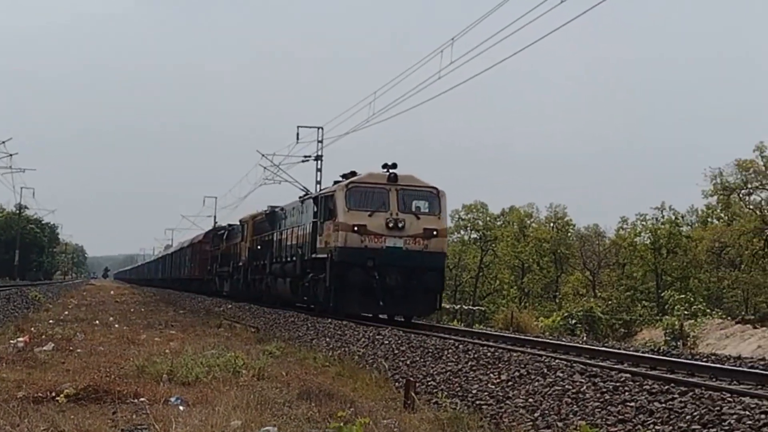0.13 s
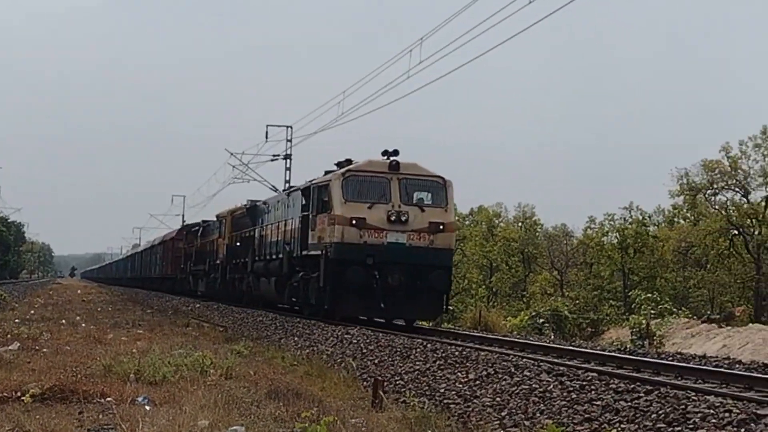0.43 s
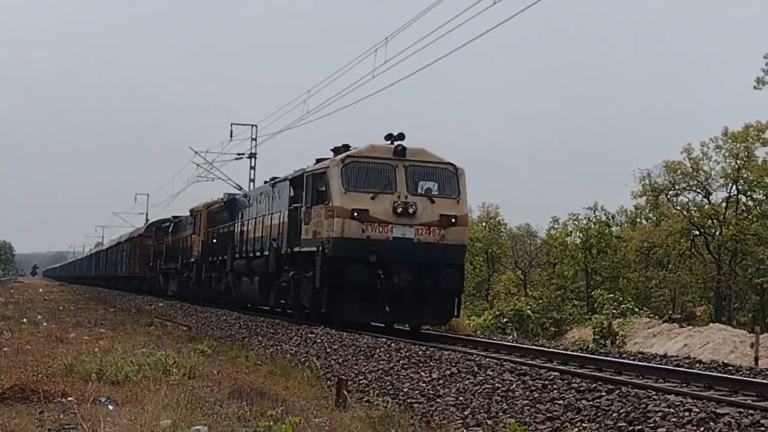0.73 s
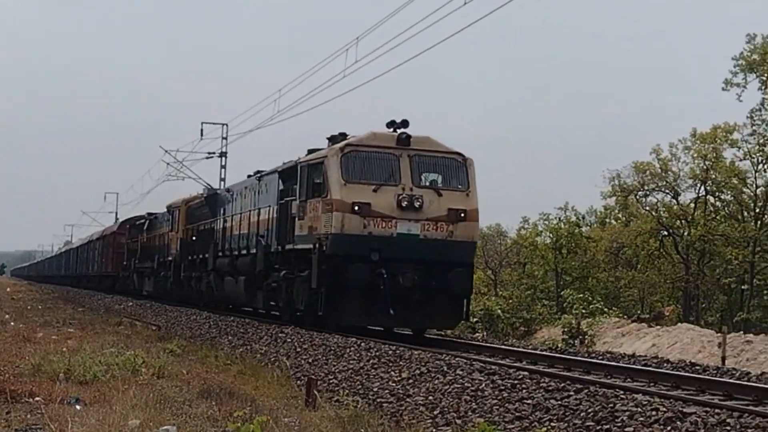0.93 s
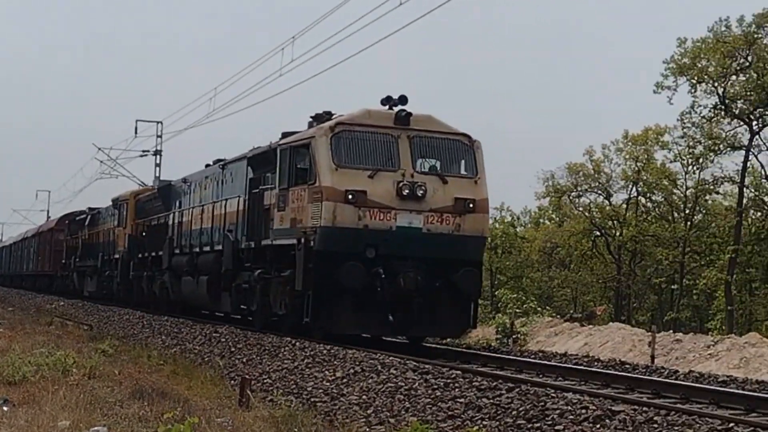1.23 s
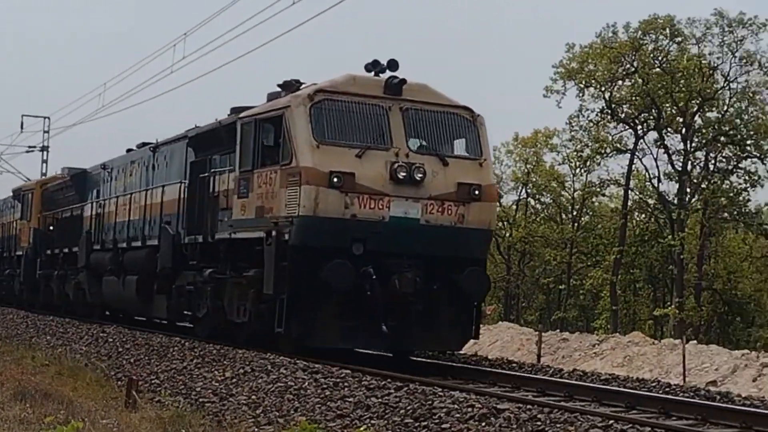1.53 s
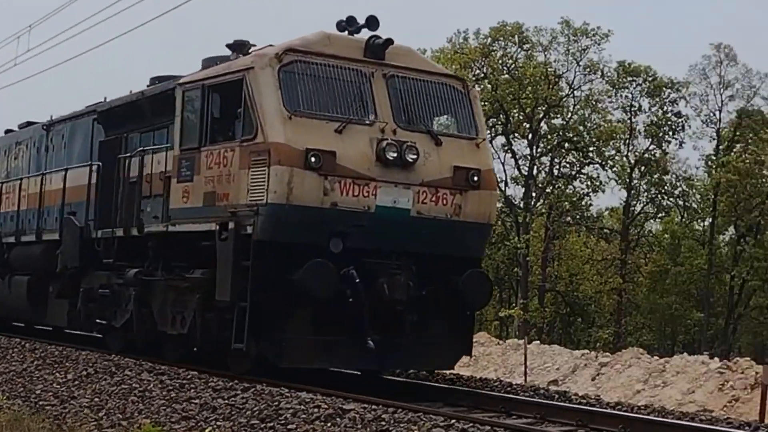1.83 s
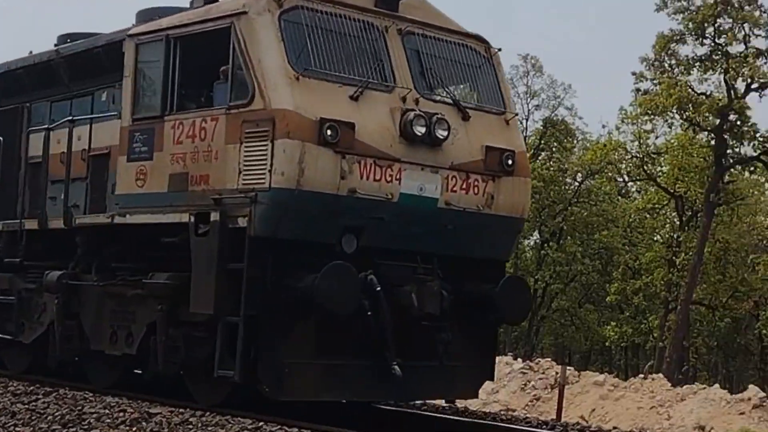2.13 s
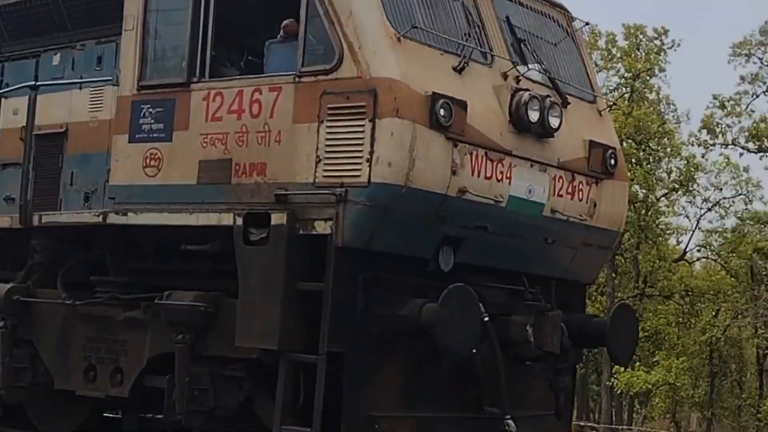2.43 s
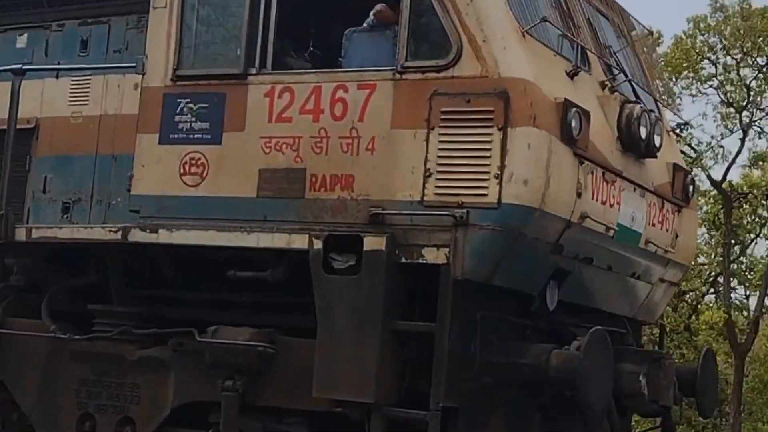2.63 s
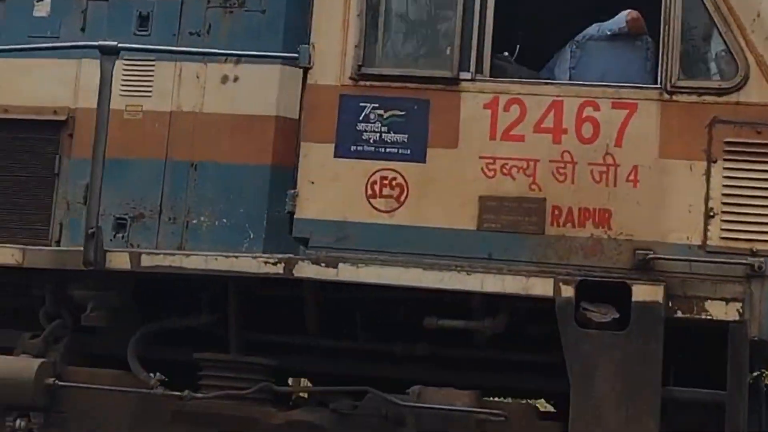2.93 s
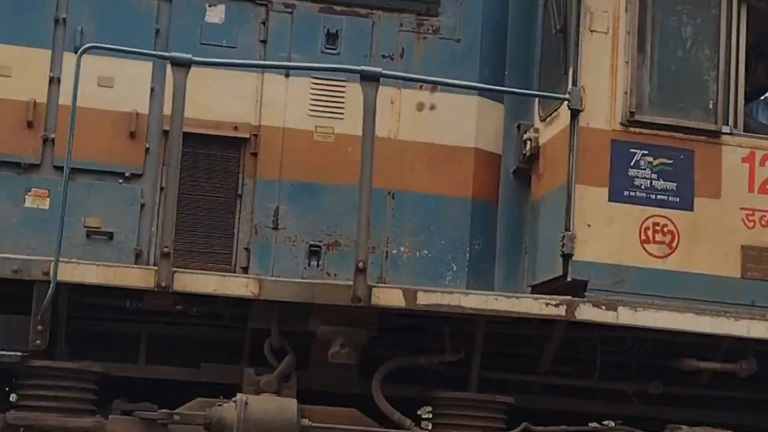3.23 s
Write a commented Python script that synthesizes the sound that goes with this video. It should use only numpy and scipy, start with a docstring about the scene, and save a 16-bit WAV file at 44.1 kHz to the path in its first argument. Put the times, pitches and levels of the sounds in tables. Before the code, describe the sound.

Two diesel engines throb low and unevenly in open air, with wind rumbling on a mono trackside microphone, strongest around 1 s, and a soft bump at 0.5 s. From 1.4 s fan drone and rolling roar build; pulsing gear whine jumps forward near 2.3 s. Around 2.8-3.4 s the cab passes close, with loud roar, machinery hum, bright rail hiss, fluttering whistles and tiny steel scrapes.

```python
"""Two diesel locomotives haul a goods train up to a trackside microphone; the first cab passes at the end.
Their exhausts throb and beat as combs of low sines over rumbling noise; fans drone in a rising noisy band.
Gears whine in time with the wheels, turbocharger and blower whistle as fluttering tones, machinery hums.
Rolling roar and rail hiss are shaped noise swelling with the approach, with a few light scrapes of steel.
A breeze rumbles on the microphone, and one soft low bump sounds early on."""
import sys
import numpy as np
from scipy.fft import rfft, irfft, next_fast_len
from scipy.io import wavfile
from scipy.ndimage import map_coordinates

SR = 44100
rng = np.random.default_rng(int(sys.argv[2]) if len(sys.argv) > 2 else 0)


def transcribe(u):
    """Save the signal u as a 16-bit wav file named by the first command-line argument.

    u: samples, shape (n,) or (channels, n), limited to [-1, 1]; the rate is SR.
    q: integer samples, one column per channel.
    """
    v = np.clip(np.atleast_2d(u).T, -1, 1)
    q = np.round(v * 32767).astype(np.int16)
    wavfile.write(sys.argv[1], SR, q)


N = 149058  # length in samples

# Approach of the train: time_s, nearness (0 far, 1 close; below 0 is farther still)
NEARNESS = [(0, -0.48), (.8, -0.43), (1.6, 0.11), (2.3, 0.62), (2.8, 0.99), (3.38, 0.65)]
# Pitch fall as the train draws level: time_s, pitch_change_percent
DOPPLER = [(0, -0.07), (2, -0.11), (2.8, -.4), (3.1, -.8), (3.38, -1.4)]

# Exhaust lines of each engine: multiple_of_cycle_rate, level_db at nearness 0, rise_db per unit nearness
LEAD_LINES = [(6, -47.5, 6.5), (7, -39, 18), (8, -22.5, 1), (9, -35, 8), (12, -37, 12.5), (13, -29.5, 6),
              (15, -26.5, 3), (16, -34, 7.5), (17, -36.5, 5.5), (24, -45, 4), (32, -45.5, 8)]
TRAIL_LINES = [(4, -38.5, 6), (5, -38.5, 2.8), (8, -33.5, 2.3), (9, -37, 12), (14, -52.5, 7),
               (16, -49, 5.9)]
LEAD_CYCLE_HZ, TRAIL_CYCLE_HZ = 6.355, 9.68
EXHAUST_WAVER_DB, EXHAUST_DRIFT_RAD, ODD_LAG_RAD = 1.0, .14, 1.0
# Turbulent exhaust rumble, spectrum: freq_hz, relative_level_db
RUMBLE_BAND = [(20, -4), (32, -6.5), (45, -3.5), (62, 4), (75, 2), (105, -3.5), (135, -6.5), (170, -11.5),
               (215, -16), (400, -53.5)]
RUMBLE_DB, RUMBLE_RISE_DB = -28, 2.5  # at nearness 0, and per unit of nearness

# Fan drone swell: time_s, level_db
FAN_LEVEL = [(0, -44), (.8, -41), (1.4, -36), (2, -31), (2.5, -29), (2.9, -29.5), (3.38, -34)]
# Middle of the fan band, rising as the train nears: time_s, centre_hz
FAN_CENTRE = [(0, 684), (1.8, 686.8), (2.4, 712.4), (2.75, 756), (3.1, 784.3), (3.38, 772)]
FAN_WIDTH_HZ, FAN_AIR_DB = 68, 0.5  # air is relative to the blade tones

# Engine room swell: time_s, level_db (reference for tones and noise)
MACHINE_LEVEL = [(0, -47), (.8, -45), (1.6, -40), (2.4, -34.5), (2.9, -35), (3.0, -31), (3.38, -30)]
# Engine room noise, spectrum: freq_hz, relative_level_db
MACHINE_BAND = [(300, -15), (550, 0.5), (800, 1.5), (920, 1), (1080, 3), (1280, 1), (1500, 2.5),
                (1700, -8.5), (2200, -10.5), (3000, -36), (6000, -45.5)]
# Auxiliary machinery tones: pitch_hz, db_relative_to_swell, flutter_knots_per_s
MACHINE_TONES = [(496.6, -13, 9), (1007, -8, 16), (1081, -13.5, 16), (1817, -21.5, 25), (2148, -14.5, 35)]
MACHINE_NOISE_DB = 3  # relative to the swell
# Faint whines from down the train: pitch_hz, level_db, flutter_knots_per_s
FAR_TONES = [(3030, -63, 45), (4626, -62, 30)]

# Gear whine swell: time_s, level_db
GEAR_LEVEL = [(0, -51), (.3, -46.5), (1.1, -42), (1.6, -42), (2.05, -43.5), (2.32, -31.5), (2.6, -34.5),
              (2.9, -35.5), (3.38, -33)]
GEAR_HZ, GEAR_WANDER_HZ, GEAR_SKIRT_DB = 1397, 4.2, -5.5
WHEEL_TURN_HZ, WHEEL_PEAK_S, WHEEL_DEPTH, WHEEL_SWING_HZ = 8.65, 1.04, .55, 6

# Turbocharger swell: time_s, level_db
TURBO_LEVEL = [(0, -55), (.8, -52.5), (1.6, -52.5), (1.75, -45), (1.97, -43.5), (2.2, -47), (2.7, -44),
               (3.2, -40.5), (3.35, -30.5)]
# Breath around the turbocharger whistle, spectrum: freq_hz, relative_level_db
TURBO_BAND = [(5100, -45), (5400, -6), (5510, -3), (5610, -2.5), (5680, -15.5), (5900, -43.5)]
TURBO_HZ, TURBO_LINE_DB, TURBO_AIR_DB = 5597, -4, -2.5  # both levels relative to the swell
# Blower swell: time_s, level_db
BLOWER_LEVEL = [(0, -66), (1.9, -59.5), (2.5, -50), (2.82, -46.5), (3.17, -38.5), (3.38, -49)]
# Blower notes: pitch_hz, db_relative_to_swell, flutter_knots_per_s
BLOWER_TONES = [(3593, 0.5, 22), (2936, -7, 40)]

# Wheels rolling on the rails: time_s, level_db before ROAR_TRIM_DB
ROAR_LEVEL = [(0, -47), (.33, -47.5), (.7, -43.5), (1.15, -41.5), (1.6, -39.5), (1.88, -36), (2.02, -34),
              (2.5, -31.5), (2.8, -27), (3.05, -27), (3.2, -25), (3.38, -24)]
# Rolling roar, spectrum: freq_hz, relative_level_db
ROAR_BAND = [(60, -23.5), (130, -3), (180, -1), (250, 0.5), (340, -1.5), (430, -5.5), (550, -6), (800, -11),
             (1500, -37)]
# Rail hiss: time_s, level_db before HISS_TRIM_DB
HISS_LEVEL = [(0.0, -47.5), (0.84, -45.5), (1.83, -43), (2.72, -35), (2.86, -32.5), (2.9, -37.5),
              (2.96, -31.5), (3.07, -34), (3.17, -29), (3.24, -33.5), (3.36, -26.5), (3.38, -34)]
# Rail hiss, spectrum: freq_hz, relative_level_db
HISS_BAND = [(900, -30), (1800, 3.5), (2600, -1), (3100, 1), (4100, -1), (4700, -1), (5400, -.5),
             (6200, -5), (7400, -4), (7800, -10), (8200, -15)]
ROAR_TRIM_DB, HISS_TRIM_DB = 1, 1

# Breeze on the microphone: time_s, level_db
WIND_LEVEL = [(0, -47), (.3, -35), (.43, -27), (.6, -28), (1, -22), (1.5, -39), (2.4, -40.5), (3.38, -29)]
# Wind rumble, spectrum: freq_hz, relative_level_db
WIND_BAND = [(6, -7.5), (15, -5), (28, -1), (45, -5.5), (90, -22.5), (200, -49)]
# Soft low bump, spectrum: freq_hz, relative_level_db
BUMP_BAND = [(70, -23), (130, 0), (190, -6), (280, -32)]
BUMP_S, BUMP_SPREAD_S, BUMP_DB = .52, 0.024, -26.5

# Flange scrapes: centre_s, spread_s (centre to 1/e), peak_db
SCRAPES = [(1.956, 0.0022, -35), (2.733, .02, -35.5), (2.996, 0.017, -40), (3.032, 0.0037, -35)]
# Scraping steel, spectrum: freq_hz, relative_level_db
SCRAPE_BAND = [(4000, -30), (6000, -9), (7200, 0), (8000, 0), (8400, -6)]

TOP_HZ = 8050  # band limit of the recorder


def amp(db):
    """Decibels to gain."""
    return 10 ** (np.asarray(db) / 20)


def unit(x):
    """Scale to rms 1."""
    return x / np.sqrt(np.mean(np.abs(x) ** 2) + 1e-20)


def clock():
    """Time of every sample in seconds."""
    return np.arange(N) / SR


def curve(rows):
    """Automation through (time_s, value) points joined by straight lines."""
    return np.interp(clock(), *np.transpose(rows))


def wobble(rate):
    """Smooth random curve with rate knots a second."""
    return map_coordinates(rng.standard_normal(4096), [clock() * rate + 4], mode="wrap")


def complex_wobble(rate):
    """Random drift of both strength and phase."""
    return wobble(rate) + 1j * wobble(rate)


def pulse(centre_s, spread_s):
    """Bell-shaped burst of peak 1, down to 1/e at spread_s from its centre."""
    return np.exp(-((clock() - centre_s) / spread_s) ** 2)


def filtered(x, response):
    """Multiply the spectrum of x by a response of frequency in Hz."""
    size = next_fast_len(N + 8192)
    spectrum = rfft(x, size) * response(np.fft.rfftfreq(size, 1 / SR))
    return irfft(spectrum, size)[:N]


def noise(band):
    """Noise of rms 1 shaped by a spectrum table, rolled off above its top."""
    freq_hz, level_db = np.transpose(band)

    def shape(hz):
        level = np.interp(np.log(hz + 1), np.log(freq_hz), level_db)
        return amp(level) / (1 + (hz / (2 * freq_hz[-1])) ** 4)

    return unit(filtered(rng.standard_normal(N), shape))


def angle(hz):
    """Running phase of a pitch, from a random start."""
    return 2 * np.pi * (np.cumsum(hz * np.ones(N)) / SR + rng.random())


def tone(hz, flutter, fuzz):
    """Doppler-bent tone near rms 1; fuzz sizes its random part, which has flutter knots a second."""
    swell = unit(1 + fuzz * complex_wobble(flutter))
    bent_hz = hz * (1 + curve(DOPPLER) / 100)
    return np.sqrt(2) * np.real(swell * np.exp(1j * angle(bent_hz)))


def exhaust():
    """Uneven cylinders give each engine a comb of low lines that fills in with nearness, over rumble."""
    near = curve(NEARNESS)
    out = amp(RUMBLE_DB + RUMBLE_RISE_DB * near) * noise(RUMBLE_BAND)
    for cycle_hz, lines in ((LEAD_CYCLE_HZ, LEAD_LINES), (TRAIL_CYCLE_HZ, TRAIL_LINES)):
        crank = angle(cycle_hz)
        for multiple, level_db, rise_db in lines:
            k = round(multiple)
            lag = k % 2 * ODD_LAG_RAD  # odd multiples are offset, so the beat limps in timing too
            line = np.sqrt(2) * np.sin(k * crank + lag + EXHAUST_DRIFT_RAD * wobble(3))
            level = level_db + rise_db * near + EXHAUST_WAVER_DB * wobble(4.2)
            out = out + amp(level) * line
    return out


def firing(depth):
    """Airflow flutters at the leading engine's cycle rate and its strong multiples."""
    beats = sum(np.cos(angle(k * LEAD_CYCLE_HZ)) for k in (1, 3, 5, 8))
    return unit(1 + depth * beats)


def fans():
    """Engine-driven blade tones and air noise share one moving band and flutter with the engine."""
    centre = curve(FAN_CENTRE)
    blades = 0
    for hz in 5 * LEAD_CYCLE_HZ * np.arange(18, 30):
        in_band = np.exp(-.5 * ((hz - centre) / FAN_WIDTH_HZ) ** 2)
        blades = blades + in_band * tone(hz, flutter=11, fuzz=1.0)
    air = np.real(complex_wobble(170) * np.exp(1j * angle(centre)))
    drone = unit(unit(blades) + amp(FAN_AIR_DB) * unit(air))
    return amp(curve(FAN_LEVEL)) * drone * firing(depth=0.097)


def machinery():
    """Engine room noise flutters with the engine, and auxiliaries add fuzzy tones."""
    tones = sum(amp(db) * tone(hz, flutter, fuzz=1.1) for hz, db, flutter in MACHINE_TONES)
    room = amp(MACHINE_NOISE_DB) * noise(MACHINE_BAND) * firing(depth=0.072)
    return amp(curve(MACHINE_LEVEL)) * (tones + room)


def far_whines():
    """Fluttering tones from down the train, faint throughout."""
    return sum(amp(db) * tone(hz, flutter, fuzz=1.3) for hz, db, flutter in FAR_TONES)


def gears():
    """The gear mesh swells and sways with each turn of the wheels, inside a noisy skirt."""
    turn = 2 * np.pi * WHEEL_TURN_HZ * (clock() - WHEEL_PEAK_S)
    wander = GEAR_WANDER_HZ * curve(NEARNESS) * wobble(7)
    sway = WHEEL_SWING_HZ * np.cos(turn) + wander
    mesh = tone(GEAR_HZ + sway, flutter=14, fuzz=.18)
    skirt = amp(GEAR_SKIRT_DB) * tone(GEAR_HZ + 14, flutter=64, fuzz=5)
    pulsing = unit(1 + WHEEL_DEPTH * np.cos(turn) - 0.2 * np.cos(2 * turn))
    return amp(curve(GEAR_LEVEL)) * pulsing * (mesh + skirt)


def turbocharger():
    """A fluttering high whistle sits in a narrow band of breathy noise."""
    whistle = amp(TURBO_LINE_DB) * tone(TURBO_HZ, flutter=28, fuzz=0.83)
    breath = amp(TURBO_AIR_DB) * noise(TURBO_BAND)
    return amp(curve(TURBO_LEVEL)) * (whistle + breath)


def blower():
    """Thin fluttering notes share the blower's swell."""
    notes = sum(amp(db) * tone(hz, flutter, fuzz=.45) for hz, db, flutter in BLOWER_TONES)
    return amp(curve(BLOWER_LEVEL)) * notes


def rolling():
    """Wheels on the rails give a low roar and a bright hiss, each wavering slightly in level."""
    roar_db = curve(ROAR_LEVEL) + ROAR_TRIM_DB + 0.42 * wobble(11)
    hiss_db = curve(HISS_LEVEL) + HISS_TRIM_DB + 0.46 * wobble(14)
    return amp(roar_db) * noise(ROAR_BAND) + amp(hiss_db) * noise(HISS_BAND)


def breeze():
    """Light wind rumbles on the microphone as gusting low noise."""
    return amp(curve(WIND_LEVEL)) * noise(WIND_BAND)


def bump():
    """One short bell-shaped burst of low noise."""
    return amp(BUMP_DB) * pulse(BUMP_S, BUMP_SPREAD_S) * noise(BUMP_BAND)


def scrapes():
    """Wheel flanges touch the rail in brief bursts of bright noise."""
    touch = sum(amp(db) * pulse(centre_s, spread_s) for centre_s, spread_s, db in SCRAPES)
    return touch * noise(SCRAPE_BAND)


def scene():
    """Mix the whole train in open air, one channel."""
    engines = exhaust() + fans() + machinery() + far_whines()
    whines = gears() + turbocharger() + blower()
    return (engines + whines + rolling() + breeze() + bump() + scrapes())[None]


def record(dry):
    """The recorder cuts off very steeply above its band limit."""
    return filtered(dry[0], lambda hz: 1 / np.sqrt(1 + (hz / TOP_HZ) ** 110))[None]


dry = scene()
out = record(dry)
transcribe(out)
```